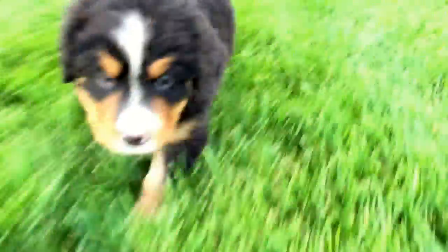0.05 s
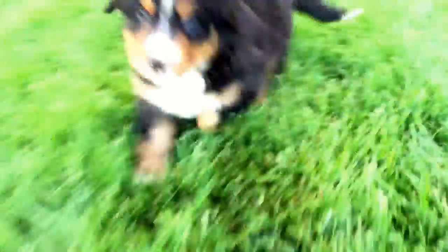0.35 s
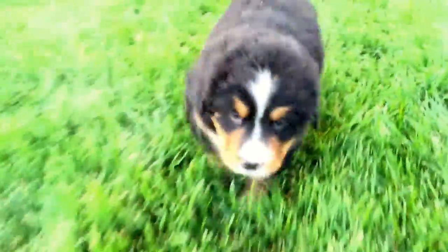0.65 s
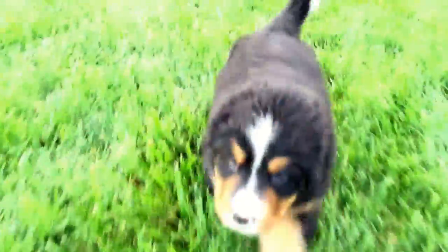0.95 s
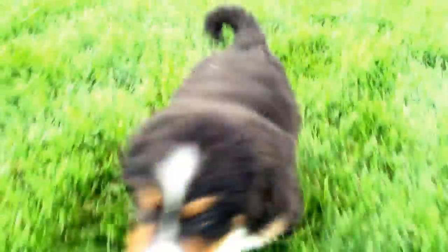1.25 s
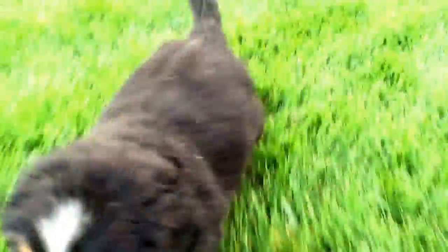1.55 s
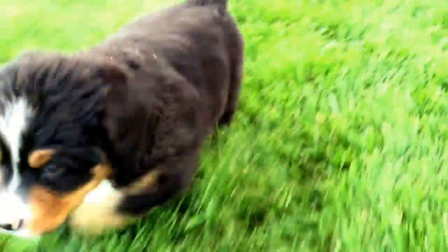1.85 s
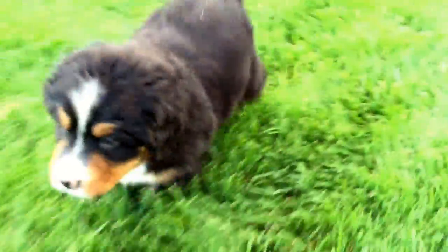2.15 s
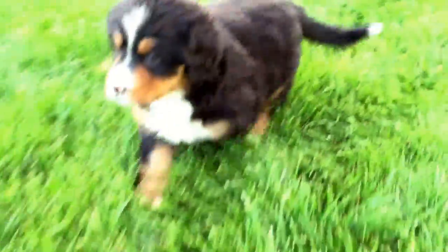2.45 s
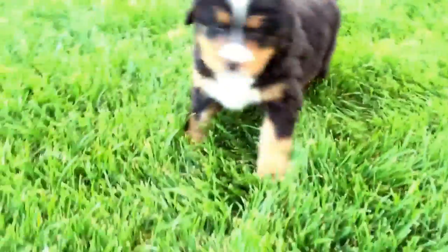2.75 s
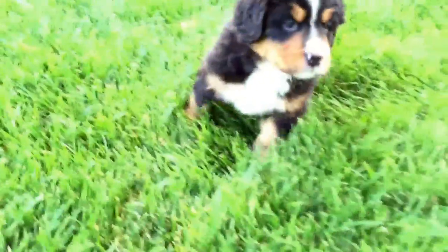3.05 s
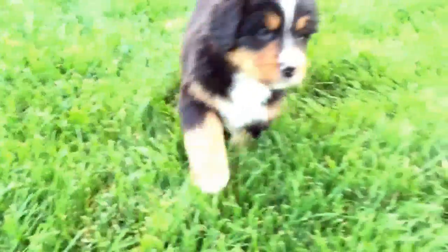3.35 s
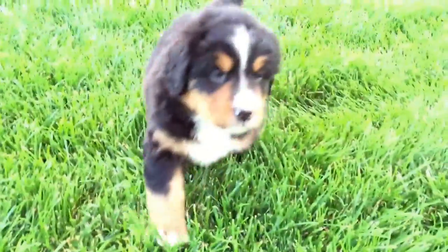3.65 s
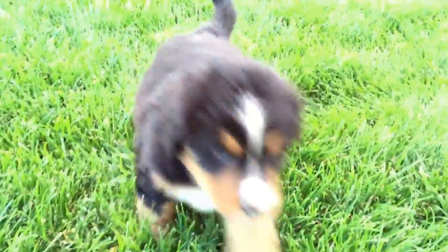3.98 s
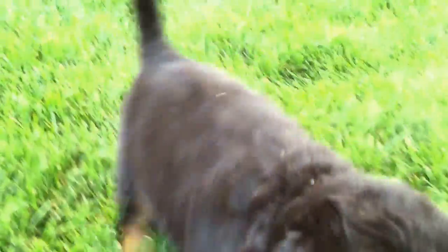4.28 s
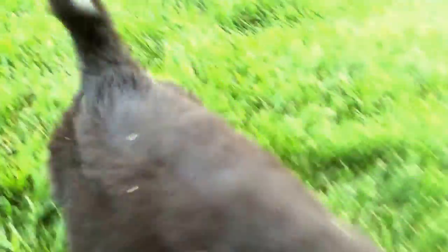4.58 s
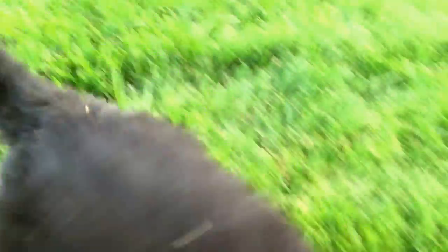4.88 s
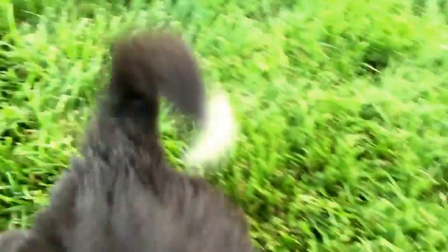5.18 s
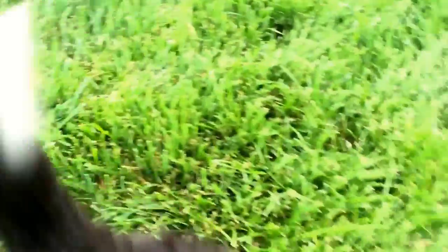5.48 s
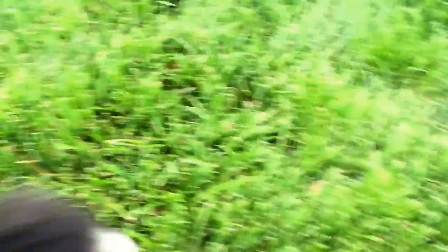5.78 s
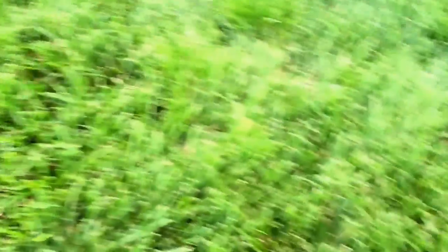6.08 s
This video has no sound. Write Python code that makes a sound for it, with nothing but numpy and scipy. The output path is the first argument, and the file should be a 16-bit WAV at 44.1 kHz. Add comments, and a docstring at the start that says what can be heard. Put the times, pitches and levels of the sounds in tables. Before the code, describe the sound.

A puppy gives four short, wavering whines and a few soft grunts while rustling through grass outdoors.

```python
"""A puppy trots over a lawn close to a hand-held camera. From the start grass swishes, steps and handling
thud, and insects trill steadily. From about 1 s its slack vocal folds give a few soft grunts, and a far
bird begins to chirp now and then. From 3.4 s the folds sing four whines through the nose, the last three
opening with a thin whistle of air in the nostrils. The last whine trails off in a wobbling whimper just
before 5 s, leaving the rustle, the thuds and the garden."""
import sys
import numpy as np
from scipy import signal
from scipy.fft import rfft, irfft, next_fast_len
from scipy.io import wavfile
from scipy.ndimage import uniform_filter1d, map_coordinates

SR = 44100
rng = np.random.default_rng(int(sys.argv[2]) if len(sys.argv) > 2 else 0)


def transcribe(signal):
    """Save signal, clipped to [-1, 1], as a 16-bit WAV file at the path in sys.argv[1]."""
    frames = np.atleast_2d(signal).T
    limited = np.clip(frames, -1, 1)
    pcm = np.round(limited * 32767).astype(np.int16)
    wavfile.write(sys.argv[1], SR, pcm)


N = 274563
T = np.arange(N) / SR
TOP_HZ = 15400  # the camera cuts the treble above this


def from_db(db):
    """Turn decibels into a number to multiply by."""
    return 10 ** (np.asarray(db) / 20)


def unit_level(x):
    """Scale a signal to an average power of 1."""
    return x / np.sqrt(np.mean(x ** 2) + 1e-20)


def curves(rows, t):
    """Join each column of a table with straight lines; the first column is time."""
    times, *columns = np.transpose(rows)
    return [np.interp(t, times, column) for column in columns]


def gain_at(colour, hz):
    """How strongly a colour, a table of frequency_hz and gain_db, passes a frequency."""
    points_hz, db = np.transpose(colour)
    return from_db(np.interp(np.log(np.maximum(hz, 1)), np.log(points_hz), db))


def tint(x, colour):
    """Filter a signal by a colour and bring it to unit level."""
    size = next_fast_len(len(x))
    spectrum = rfft(x, size) * gain_at(colour, np.fft.rfftfreq(size, 1 / SR))
    return unit_level(irfft(spectrum, size)[:len(x)])


def noise(colour):
    """Steady noise of a given colour."""
    return tint(rng.standard_normal(N), colour)


def wander(rate_hz, t):
    """A smooth random curve, mostly within -1 to 1, with rate_hz new values a second."""
    steps = rng.standard_normal(8192)
    return map_coordinates(steps, [(t - t[0]) * rate_hz], order=3, mode="wrap")


def fade(t, start, end, rise_s, fall_s):
    """Fade in after start and out before end."""
    ramp = np.minimum((t - start) / rise_s, (end - t) / fall_s)
    return np.sin(np.pi / 2 * np.clip(ramp, 0, 1)) ** 2


def span(start, end):
    """Sample times from start to end."""
    return T[max(int(start * SR), 0):int(end * SR)]


def add(out, start, x):
    """Mix a sound in at a time."""
    i = max(int(round(start * SR)), 0)
    out[i:i + len(x)] += x[:N - i]


def movements(rows, rise_s, fall_s, sag_db_per_s=0):
    """Strength of overlapping movements: each builds up, holds or sags, then dies away."""
    power = np.zeros(N)
    for start, length, db in rows:
        age = span(start, start + length + 6 * fall_s) - start
        shape = np.clip(age / rise_s, 0, 1) * np.exp(-np.maximum(age - length, 0) / fall_s)
        add(power, start, (shape * from_db(db - sag_db_per_s * age)) ** 2)
    return np.sqrt(power)


def rubs(rows, colour):
    """Short bursts of rubbing noise."""
    force = np.zeros(N)
    for start, length, db in rows:
        end = start + length
        add(force, start, from_db(db) * fade(span(start, end), start, end, length / 4, length / 3))
    return force * noise(colour)


# colour of still air: frequency_hz, gain_db
AIR_COLOUR = [(40, -6), (110, -2.5), (300, -9), (1500, -9), (2400, -20.5), (5000, -14.5), (9500, -17),
              (10500, -22), (12000, -19.5), (15000, -15.5)]
def still_air(level_db=-68.5):
    """A faint, even hiss behind everything."""
    return noise(AIR_COLOUR) * from_db(level_db)


# colour of the insect chorus: frequency_hz, gain_db
INSECT_COLOUR = [(2700, -29), (3300, -9), (3600, -4.5), (3780, 8), (3930, -1.5), (4200, -13), (4800, -31.5)]
def insects(level_db=-63, trill_hz=55, trill_depth=0.24, swell_db=2.1):
    """Distant insects blend into one narrow band of noise that pulses fast, swells and ebbs."""
    trill = 1 + trill_depth * np.sin(2 * np.pi * trill_hz * T + 2 * wander(7.9, T))
    return noise(INSECT_COLOUR) * trill * from_db(level_db + swell_db * wander(9, T))


# chirps of a far bird: start_s, length_s, first_pitch_hz, last_pitch_hz, level_db
BIRD_CHIRPS = [(1.58, 0.056, 4450, 3530, -64), (1.621, 0.026, 3350, 3170, -50.5),
               (2.733, 0.055, 3400, 3520, -66), (2.788, 0.033, 8250, 8200, -59),
               (2.78, 0.039, 3230, 3150, -61), (2.96, 0.062, 3400, 3160, -72),
               (3.156, 0.038, 4600, 4480, -65), (4.856, 0.032, 4840, 5840, -50.5),
               (5.842, 0.038, 4600, 4680, -70), (6.093, 0.05, 3370, 3210, -57)]
def bird(waver=0.01, echo=0.58, echo_decay_s=0.016):
    """Gliding chirps, smeared by echoes from trees and walls."""
    chirps = np.zeros(N)
    for start, length, first_hz, last_hz, db in BIRD_CHIRPS:
        t = span(start, start + length)
        hz = np.linspace(first_hz, last_hz, len(t)) * (1 + waver * wander(383, t))
        tone = np.sqrt(2) * np.sin(2 * np.pi * np.cumsum(hz) / SR)
        add(chirps, start, from_db(db) * tone * fade(t, start, start + length, 0.011, 0.0021))
    t = span(0, .15)
    tail = unit_level(rng.standard_normal(len(t)) * np.exp(-t / echo_decay_s)) / np.sqrt(len(t))
    return (chirps + echo * signal.fftconvolve(chirps, tail)[:N]) / np.hypot(1, echo)


# the hand jostles the camera: start_s, length_s, level_db
HAND_JOSTLES = [(0, 0.04, -52), (.35, 0.26, -54), (1.27, 0.054, -58), (1.38, 0.075, -56),
                (1.79, 0.62, -60.5), (2.69, 0.091, -66), (3.0, .07, -64.5), (4.02, 0.46, -70.5),
                (4.56, 0.37, -53.5), (4.83, 0.12, -45), (4.95, 0.093, -56), (5.8, 0.44, -70)]
# colour of the rumble: frequency_hz, gain_db
LOW_RUMBLE_COLOUR = [(25, -27), (40, 1), (60, 4.5), (100, -5), (170, -17.5), (300, -23.5), (600, -75)]
def rumble(breeze_db=-75, gust_db=4):
    """The hand on the camera and the breeze on the microphone make a low, uneven rumble."""
    handling = movements(HAND_JOSTLES, rise_s=0.021, fall_s=0.022)
    low_noise = noise(LOW_RUMBLE_COLOUR)
    breeze = from_db(breeze_db + gust_db * wander(3.4, T))
    return low_noise * np.hypot(handling, breeze)


# dull knocks: start_s, pitch_hz, level_db, decay_s
KNOCKS = [(0.164, 98, -45, 0.0036), (0.211, 222, -39.5, 0.0031), (0.484, 188, -40, 0.0099),
          (0.614, 130, -48, 0.0037), (0.796, 125, -42, 0.0019), (0.855, 100, -39.5, 0.007),
          (1.149, 111, -48, 0.0041), (1.304, 107, -39.5, 0.0057), (1.375, 63, -47, 0.014),
          (1.677, 77.5, -36, 0.012), (1.738, 187, -36, 0.0059), (2.248, 116, -35.5, 0.0054),
          (2.439, 62, -47.5, .012), (4.86, 97, -29.5, 0.0083), (4.908, 128, -35, 0.0034),
          (4.942, 79.4, -50, 0.011), (4.981, 128, -43, 0.0043), (5.494, 107.5, -47, 0.0088)]
def thuds(pitch_sag=0.17):
    """Steps and handling make soft knocks that swell for an instant and sink in pitch."""
    out, t = np.zeros(N), span(0, .15)
    for start, hz, db, decay in KNOCKS:
        sinking_hz = hz * (1 - pitch_sag * (1 - np.exp(-t / (2 * decay))))
        phase = 2 * np.pi * np.cumsum(sinking_hz) / SR
        swell = t / decay * np.exp(1 - t / decay)
        add(out, start, from_db(db) * np.sin(phase) * swell)
    return out


def grains(spread_db, colour):
    """A crowd of tiny touches, most weak and a few stronger."""
    strength = np.minimum(rng.exponential(size=N), 4)
    return tint(rng.standard_normal(N) * from_db(spread_db * strength), colour)


def crackle(colour, ticks_per_s=70, spread_db=4):
    """Scattered ticks of stiff blades springing back."""
    ticks = (rng.random(N) < ticks_per_s / SR) * rng.choice([-1, 1], N)
    strength = from_db(spread_db * np.clip(rng.standard_normal(N), -2, 2))
    return tint(ticks * strength, colour)


# legs and body sweep through the grass: start_s, length_s, blade_db, stem_db
GRASS_SWEEPS = [(-.03, 0.061, -52.5, -55), (0.04, 0.2, -56, -61.5), (0.304, 0.12, -53.5, -59.5),
                (0.39, 0.13, -58.5, -60), (0.526, 0.084, -53, -60), (0.634, 0.17, -59.5, -64.5),
                (0.814, 0.061, -59, -67.5), (0.938, 0.063, -64.5, -70), (1.024, 0.18, -56.5, -60),
                (1.2, 0.16, -54, -62.5), (1.369, 0.25, -60, -63), (1.63, .17, -55.5, -58.5),
                (1.826, 0.17, -64.5, -71.5), (2.005, .11, -58, -63.5), (2.237, 0.083, -62, -69.5),
                (2.325, 0.1, -60, -59.5), (2.415, 0.14, -64.5, -70), (2.612, 0.096, -65.5, -68.5),
                (2.747, 0.47, -71, -71.5), (3.181, 0.049, -64.5, -65.5), (4.111, 0.13, -58.5, -74),
                (4.152, 0.21, -54, -85), (4.406, 0.071, -60, -62), (4.61, 0.069, -58.5, -80),
                (4.782, 0.06, -58, -66), (4.852, 0.05, -57.5, -58), (5.003, 0.014, -64, -68),
                (5.314, 0.089, -67.5, -65), (5.379, 0.29, -59.5, -62), (5.672, 0.12, -73, -66.5),
                (5.925, 0.085, -64, -64.5), (6.012, 0.16, -68, -65.5)]
# single blades flick free: start_s, length_s, level_db
BLADE_FLICKS = [(1.303, 0.016, -49), (2.38, 0.0066, -47)]
# colours of the blades and of the stems: frequency_hz, gain_db
BLADE_COLOUR = [(1500, -38), (3500, 5), (5000, -2.5), (6400, 4), (8000, -1.5), (9500, 0.5), (10500, -5.5),
                (12000, 1.5), (15000, 0)]
STEM_COLOUR = [(100, 3), (300, 2.5), (550, -4), (1000, 0.5), (1600, 2), (2400, 2.5), (3300, 0.5),
               (4500, -2.5), (7000, -29)]
def grass(boost_db=3, blade_rest_db=-77, stem_rest_db=-75.5, crackle_db=-13, flicker_db=0.92, tuft_db=2):
    """Blades slip past each other with a fine, crackling hiss; stems add a duller swish, tuft by tuft."""
    def sweeps(levels_db, rest_db):
        moving = movements(zip(starts, lengths, levels_db), rise_s=0.036, fall_s=0.035, sag_db_per_s=12)
        return np.hypot(moving, from_db(rest_db))  # the lawn still stirs between sweeps

    starts, lengths, blade_db, stem_db = np.transpose(GRASS_SWEEPS)
    hiss = grains(2, BLADE_COLOUR) + from_db(crackle_db) * crackle(BLADE_COLOUR)
    hiss *= sweeps(blade_db, blade_rest_db) * from_db(boost_db + flicker_db * wander(90, T))
    swish = grains(4.5, STEM_COLOUR)
    swish *= sweeps(stem_db, stem_rest_db) * from_db(boost_db + tuft_db * wander(50, T))
    return hiss + swish + rubs(BLADE_FLICKS, BLADE_COLOUR)


# brisk brushes through the blades: start_s, length_s, level_db
GRASS_BRUSHES = [(.208, 0.0076, -52), (0.587, 0.016, -34.5), (0.597, 0.025, -40.5), (1.752, 0.0062, -54),
                 (1.921, .004, -61), (2.393, 0.0047, -69), (4.017, 0.0043, -54), (4.475, 0.0049, -59)]
# their colour: frequency_hz, gain_db
GRASS_BRUSH_COLOUR = [(88, -35), (150, 4.5), (294, 4.5), (833, -9), (1800, 4), (2180, -4), (3030, 3),
                      (4290, -2), (9820, -8.5), (10600, -13), (15000, 0)]
def brushes():
    """Quick, bright rubs against the grass."""
    return rubs(GRASS_BRUSHES, GRASS_BRUSH_COLOUR)


# soft scuffs: start_s, length_s, level_db
PAW_SCUFFS = [(.203, 0.0094, -58), (.326, 0.0082, -57), (.385, 0.087, -58), (.478, 0.041, -54.5),
              (1.022, 0.036, -61), (1.678, 0.013, -49), (2.045, 0.027, -53.5), (2.36, 0.082, -56.5),
              (3.065, 0.067, -63.5), (5.26, 0.017, -56.5), (5.29, 0.013, -52), (5.435, 0.039, -56)]
# their colour: frequency_hz, gain_db
PAW_SCUFF_COLOUR = [(40, -30), (130, 8.5), (300, 2.5), (600, -4), (1000, 4), (1500, -1.5), (2300, -7),
                    (5000, -49)]
def scuffs():
    """Dull rubs of paws and fur."""
    return rubs(PAW_SCUFFS, PAW_SCUFF_COLOUR)


# tones the closed muzzle rings with: pitch_hz, decay_s, gain_db
MUZZLE_TONES = [(280, 0.0019, 2), (587, 0.0018, 23), (854, 0.0037, 12.5), (1220, 0.0051, 1),
                (1420, 0.0069, 2)]
# creaky grunts: start_s, length_s, first_pulse_rate_hz, last_pulse_rate_hz, level_db, chest_gain_db
PUPPY_GRUNTS = [(0.852, .02, 73.7, 73, -41, -3), (1.1993, 0.019, 294, 266, -35, -5.5),
                (1.224, 0.079, 97.6, 79.3, -30, -13.5), (1.691, 0.026, 126.8, 111.6, -30, -4),
                (1.725, 0.012, 275, 240, -37, -14), (2.0588, .03, 148.6, 128, -32, -3),
                (2.2465, .003, 103, 100, -29.5, -8)]
def grunts(edge_db=-4, muffle_hz=1780):
    """Slack vocal folds snap shut pulse by pulse, and each snap rings the closed muzzle."""
    out, t = np.zeros(N), span(0, .05)
    ring = sum(from_db(db) * np.cos(2 * np.pi * hz * t) * np.exp(-t / decay)
               for hz, decay, db in MUZZLE_TONES)
    # lips and fur let nothing high through
    ring = signal.sosfilt(signal.butter(10, muffle_hz, fs=SR, output="sos"), ring)
    ring /= np.abs(ring).max()
    for start, length, first_hz, last_hz, db, chest_db in PUPPY_GRUNTS:
        age = 0
        for random_db in rng.standard_normal(16):
            if age >= length:
                break
            period = 1 / np.interp(age, [0, length], [first_hz, last_hz])
            arch = np.sin(np.pi * age / length)  # strongest in the middle
            force = from_db(db + edge_db * (1 - arch) + random_db)
            add(out, start + age, force * ring)
            # the chest swells before each snap and sinks after it
            cycle = np.pi * span(0, 2 * period) / period
            chest = -np.sin(2 * cycle) * np.sin(cycle / 2) ** 2
            add(out, start + age - period, force * from_db(chest_db) * chest)
            age += period
    return out


def harmonics(hz, colour, count):
    """The vocal folds' phase, their tones at 1, 2, 3... times the pitch, and each tone's gain."""
    phase = 2 * np.pi * np.cumsum(hz) / SR
    multiple = np.arange(1, count + 1)[:, None]
    gains = gain_at(colour, multiple * hz) * (multiple * hz < TOP_HZ)
    return phase, np.sin(multiple * phase), gains


# one list of points for each whimper: time_s, pitch_hz, level_db, creak (0-1)
WHIMPER_PATHS = [
    [(3.335, 312, -64, 0.87), (3.375, 545, -55, 0.44), (3.384, 640, -42.5, .1), (3.402, 674, -35, 0),
     (3.418, 639, -37.5, 0.04)],
    [(2.115, 668, -59, 0.5), (2.13, 767, -53, 0.4), (2.153, 870, -61, 0.1)],
    [(4.725, 794, -49, 0), (4.746, 542, -48, 0), (4.763, 836, -49, 0.05), (4.775, 497, -41.5, 0),
     (4.796, 576, -46, 0.3), (4.82, 405.5, -45, 0.35), (4.842, 498, -42.5, 0.98), (4.862, 320, -53, 0.4)],
]
# colour of the closed muzzle: frequency_hz, gain_db
MUZZLE_COLOUR = [(300, 11.5), (600, 3.5), (900, 1.5), (1350, -2.5), (1700, -13.5), (2100, -34), (3300, -21),
                 (5000, -28)]
def whimpers(creak_depth=0.81):
    """A weak, wobbly voice behind a closed mouth; when it creaks, strong and weak cycles take turns."""
    out = np.zeros(N)
    for path in WHIMPER_PATHS:
        start, end = path[0][0] - .003, path[-1][0] + 0.0095
        t = span(start, end)
        hz, db, creak = curves(path, t)
        wobble = 1 + (.01 + .07 * creak) * wander(400, t)
        phase, waves, gains = harmonics(hz * wobble, MUZZLE_COLOUR, count=8)
        uneven = 1 + creak * (creak_depth * np.sin(phase / 2) + wander(309.7, t) / 2)
        voice = unit_level((waves * gains).sum(axis=0) * uneven)
        add(out, start, voice * from_db(db) * fade(t, start, end, 0.0051, 0.005))
    return out


# nose whistles: start_s, length_s, first_pitch_hz, last_pitch_hz, level_db
NOSE_WHISTLES = [(3.82, 0.016, 6900, 7250, -42.5), (4.163, 0.036, 7250, 7190, -35.5),
                 (4.575, 0.02, 7200, 7130, -42)]
# colour of breath through the nose, in whistles and whines: frequency_hz, gain_db
BREATH_COLOUR = [(500, -28), (1500, -5), (2250, -31), (3200, -17), (4400, 8), (5200, -8), (6600, 6),
                 (8000, -13), (9500, 0), (10600, -18), (12500, -2), (15000, -24)]
def whistles(octave_db=-15, waver=0.0034, breath_db=-24):
    """Air squeezed through the nostrils swells into a thin whistle just before the voice catches."""
    out, breath = np.zeros(N), noise(BREATH_COLOUR)
    for start, length, first_hz, last_hz, db in NOSE_WHISTLES:
        t = span(start, start + length)
        hz = np.linspace(first_hz, last_hz, len(t)) * (1 + waver * wander(380, t))
        phase = 2 * np.pi * np.cumsum(hz) / SR
        tone = np.sqrt(2) * (np.sin(phase) + from_db(octave_db) * np.sin(2 * phase))
        force = from_db(db + 1.3 * wander(150, t)) * fade(t, start, start + length, .008, .006)
        add(out, start, force * (tone + from_db(breath_db) * breath[:len(t)]))
    return out


# the four whines: start_s, end_s, octave_db, opening_rasp (0-1), rasp_length_s,
# closing_pitch_drop (0-1), turned_away (0-1)
PUPPY_WHINES = [(3.407, 3.65, -40, 0.77, 0.0081, 0.35, 0.12), (3.826, 4.019, -38.5, 0.62, 0.022, 0.27, 0),
                (4.182, 4.435, -38.5, 0.44, .014, 0.33, 0.96), (4.581, 4.727, -49, 1, 0.038, .03, 1)]
# one list of points for each whine: time_s, pitch_hz, lowest_tone_db, upper_tones_db
WHINE_PATHS = [
    [(3.412, 612, -32, -46), (3.422, 580, -34.5, -51), (3.44, 599, -33.5, -52), (3.465, 563, -33, -51),
     (3.49, 549, -32.5, -47.5), (3.52, 566, -31.5, -50), (3.55, 598, -30, -47.5), (3.6, 587, -29.5, -47),
     (3.625, 557, -30, -47.5)],
    [(3.833, 508, -40.5, -58), (3.845, 516, -34, -52), (3.862, 572, -29, -48), (3.884, 611, -28, -46),
     (3.905, 595, -29.5, -46.5), (3.93, 561, -28, -47.5), (3.96, 555.6, -29.5, -47), (3.987, 576, -28, -46),
     (4.003, 577, -28, -49.5)],
    [(4.188, 568, -32.5, -73), (4.198, 639, -28.5, -42.5), (4.212, 692, -31.5, -39),
     (4.234, 716, -33.5, -39), (4.268, 643.4, -31.5, -40.5), (4.3, 637.3, -31.2, -41),
     (4.35, 603.4, -27.5, -41), (4.39, 595, -26, -38.5), (4.414, 575, -26.5, -44.5)],
    [(4.59, 590, -38.5, -55), (4.6, 602, -30.5, -50.5), (4.618, 628, -27.5, -44.5),
     (4.638, 678, -29.5, -36), (4.655, 645, -28.5, -40.5), (4.672, 624, -27, -44.5),
     (4.69, 588, -28, -44.5), (4.705, 602, -30.5, -47.5), (4.719, 583, -25, -71)],
]
# colour of nose and throat, for the third harmonic and up: frequency_hz, gain_db
THROAT_COLOUR = [(1500, 4.5), (1850, 0), (2200, -15), (2400, -5), (2700, -4), (3100, 7.5), (3400, 0.5),
                 (3900, -8), (4450, -5.5), (5100, -33), (6000, -15), (7000, -13.5), (7700, -26),
                 (8400, -14), (9100, -21), (9900, -21), (10800, -31), (12000, -29), (15000, -38)]
def whines(settle_s=0.0071, slack_s=0.007, slack_db=-32, flutter_db=2.15, shade_db=-11,
           breath_db=-24, rasp_db=16, upper_boost_db=1.5, dip_hz=1424, dip_width_hz=32, dip_db=-11):
    """The vocal folds sing a clean tone with raspy ends; air hisses through the nose once a cycle."""
    out, breath = np.zeros(N), noise(BREATH_COLOUR)
    for (start, end, octave_db, rasp, rasp_length, drop, away), path in zip(PUPPY_WHINES, WHINE_PATHS):
        t = span(start, end)
        hz, lowest_db, upper_db = curves(path, t)
        # the folds settle after the rasp, and go slack as the air runs out
        opening = (1 - np.tanh((t - start - rasp_length) / settle_s)) / 2
        slack = np.exp((t - end) / slack_s)
        rough = np.clip(.04 + rasp * opening + .6 * slack, 0, 1)
        hz = hz * (1 - drop * np.minimum(2 * slack, 1))
        pitch_shake = 1 + (.0015 + .07 * rough ** 1.5) * wander(500, t)
        level_shake = from_db(2.6 * rough * wander(350, t))
        smooth_hz = uniform_filter1d(hz, int(0.0053 * SR))
        phase, waves, gains = harmonics(smooth_hz * pitch_shake, THROAT_COLOUR, count=26)
        # the head shades the highest tones as the puppy turns aside
        tone_hz = np.arange(1, len(gains) + 1)[:, None] * hz
        gains *= from_db(shade_db * away * np.interp(tone_hz, [6500, 8200], [0, 1]))
        # the higher a tone, the more it flutters
        depths_db = flutter_db * np.clip(tone_hz / 3000, .7, 3)
        upper = sum(wave * gain * from_db(depth_db * wander(70, t))
                    for wave, gain, depth_db in zip(waves[2:], gains[2:], depths_db[2:]))
        # the nose swallows the octave of the highest notes
        swallowed_db = dip_db * np.exp(-((2 * hz - dip_hz) / dip_width_hz) ** 2)
        octave_gain = from_db(octave_db + swallowed_db) * np.clip((t - start) / 0.016, 0, 1)
        low = np.sqrt(2) * (from_db(lowest_db + slack_db * slack) * waves[0] + octave_gain * waves[1])
        hiss = from_db(breath_db + rasp_db * rough) * breath[:len(t)] * (1 + .5 * np.cos(phase))
        high = from_db(upper_db + upper_boost_db) * (1 - slack) * (unit_level(upper) + hiss)
        add(out, start, (low + high) * level_shake * fade(t, start, end, 0.015, 0.015))
    return out


def scene():
    """The puppy's voice, the sounds of moving and the garden, in one channel."""
    voice = whines() + whimpers() + grunts() + whistles()
    moving = thuds() + rumble() + grass() + brushes() + scuffs()
    garden = insects() + bird() + still_air()
    return (voice + moving + garden)[None]


def record(dry):
    """The camera cuts the top of the treble."""
    return signal.sosfilt(signal.ellip(10, .2, 70, TOP_HZ, fs=SR, output="sos"), dry)


dry = scene()
out = record(dry)
transcribe(out)
```